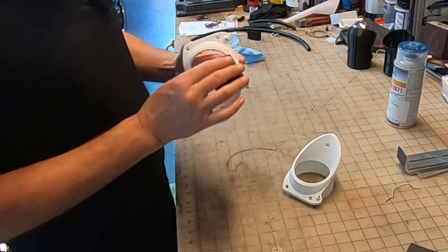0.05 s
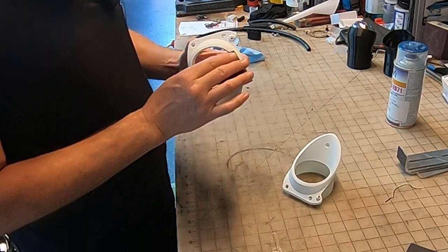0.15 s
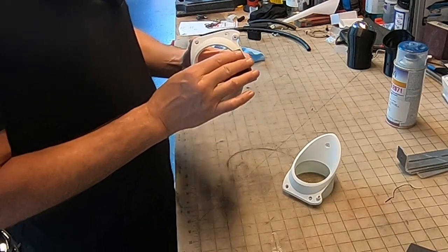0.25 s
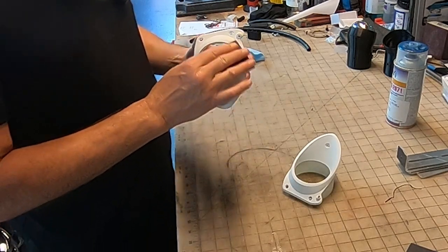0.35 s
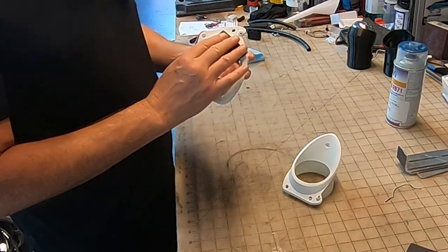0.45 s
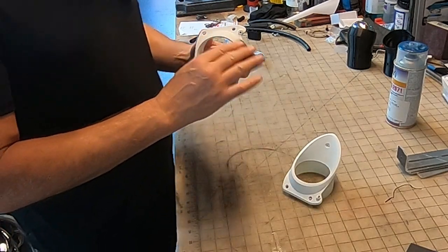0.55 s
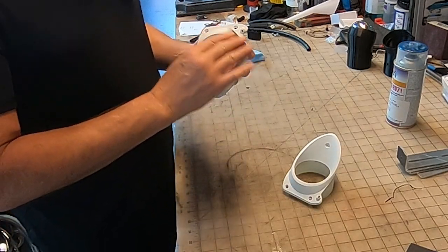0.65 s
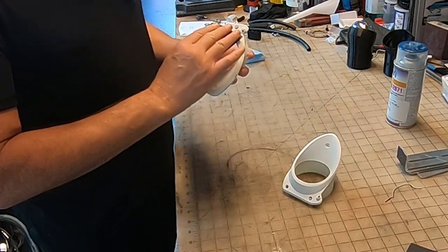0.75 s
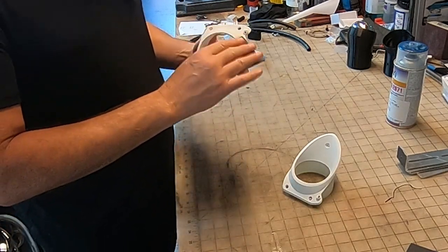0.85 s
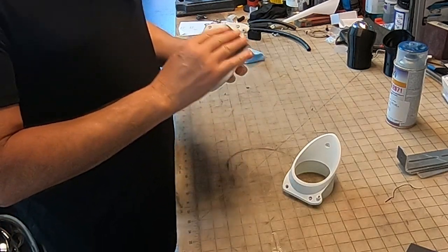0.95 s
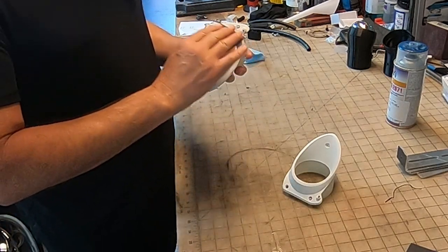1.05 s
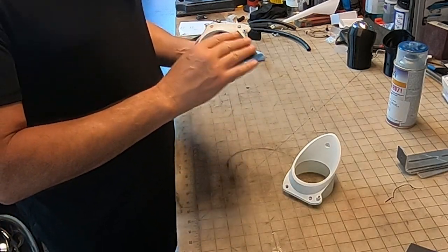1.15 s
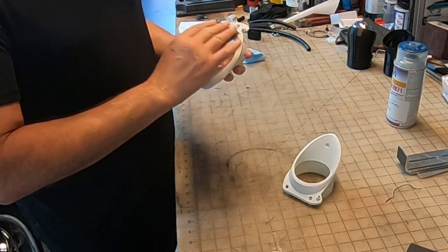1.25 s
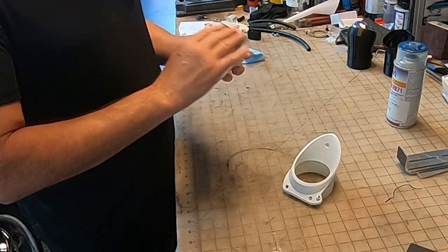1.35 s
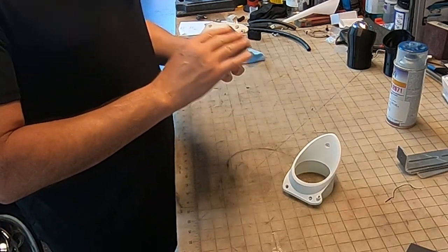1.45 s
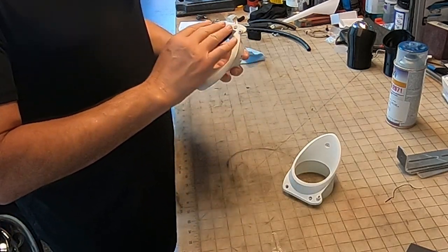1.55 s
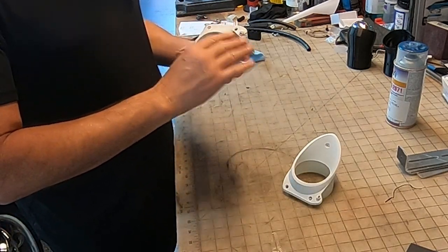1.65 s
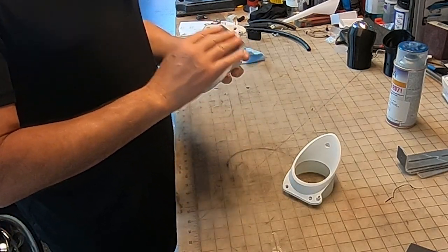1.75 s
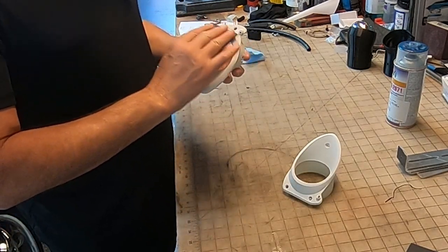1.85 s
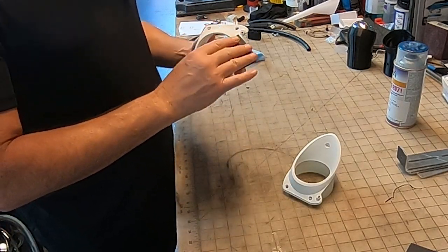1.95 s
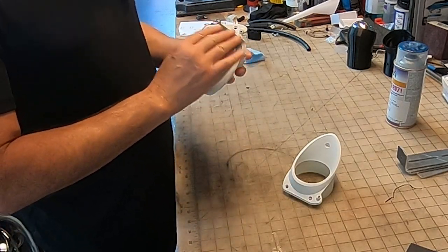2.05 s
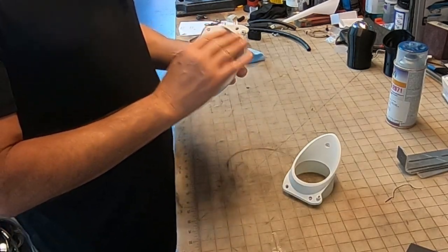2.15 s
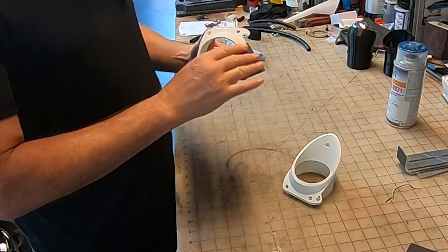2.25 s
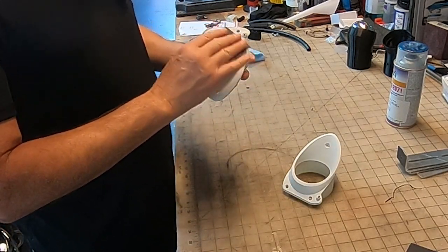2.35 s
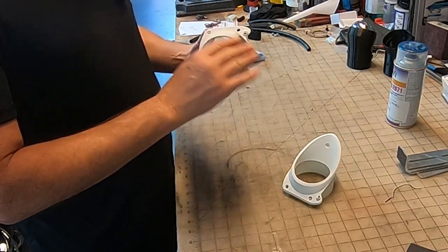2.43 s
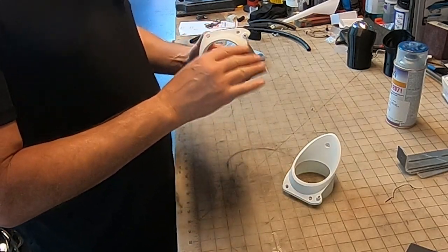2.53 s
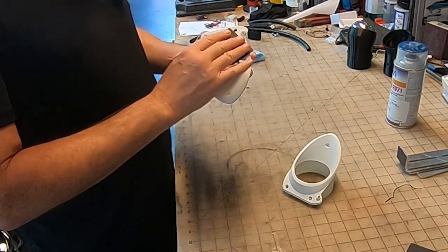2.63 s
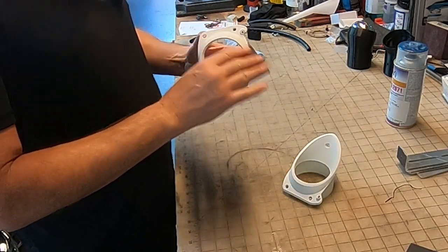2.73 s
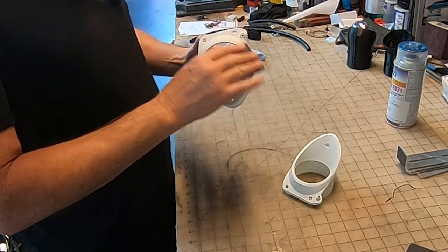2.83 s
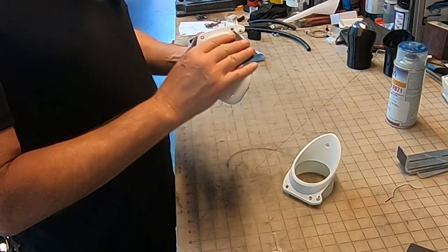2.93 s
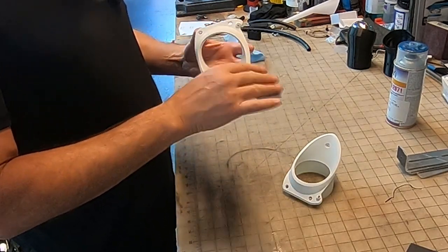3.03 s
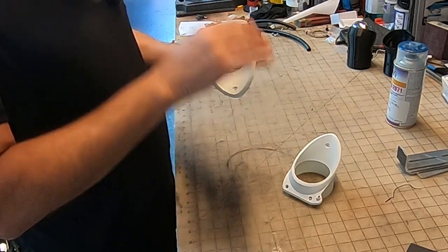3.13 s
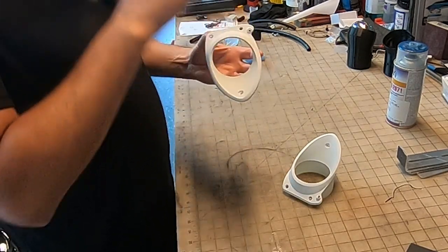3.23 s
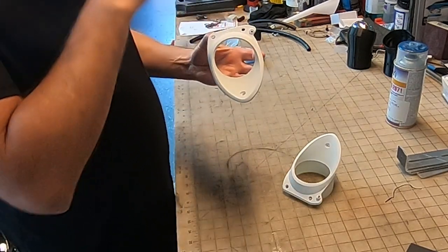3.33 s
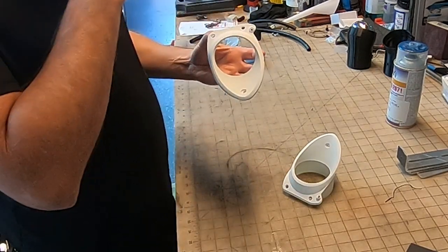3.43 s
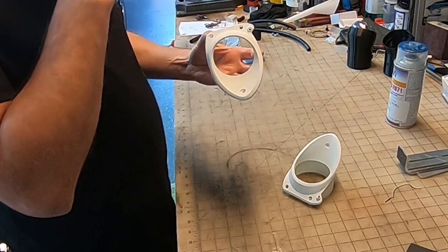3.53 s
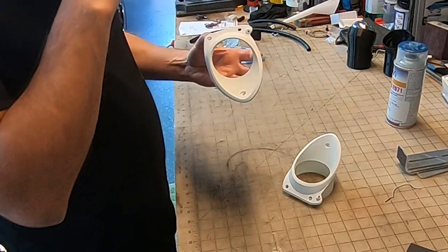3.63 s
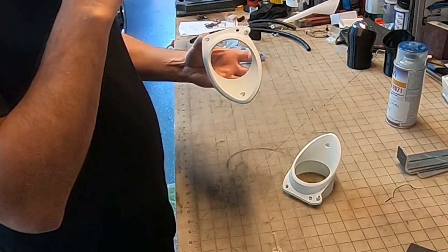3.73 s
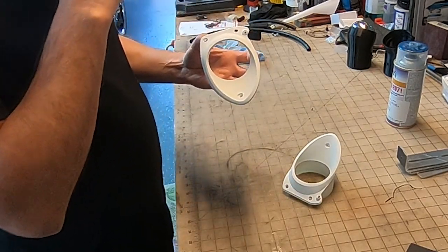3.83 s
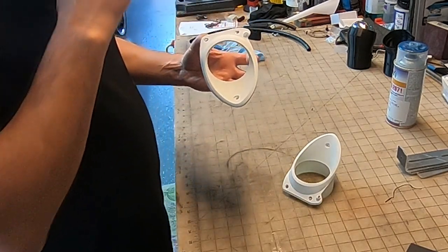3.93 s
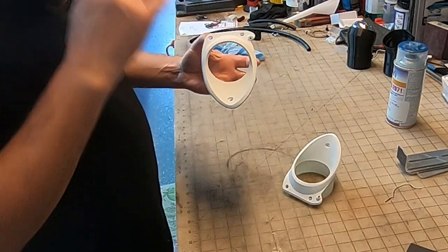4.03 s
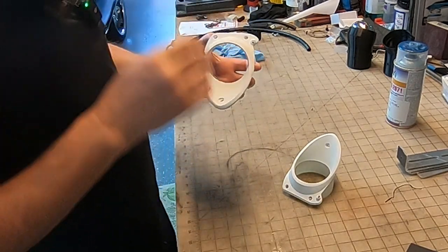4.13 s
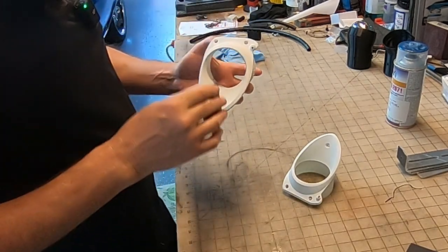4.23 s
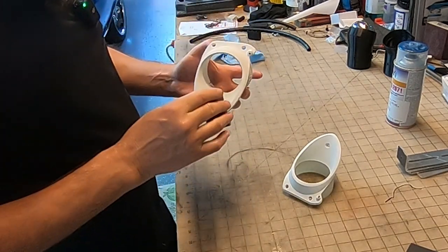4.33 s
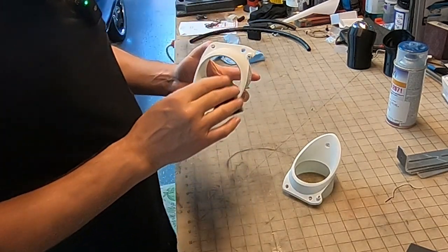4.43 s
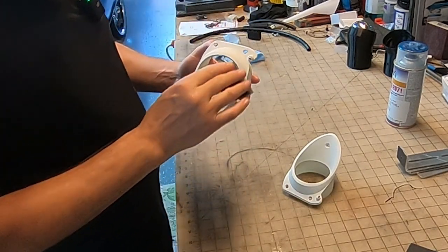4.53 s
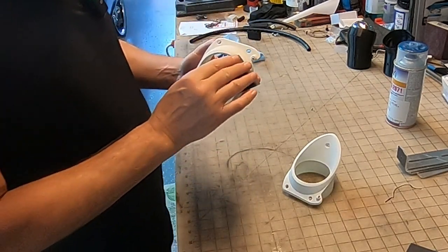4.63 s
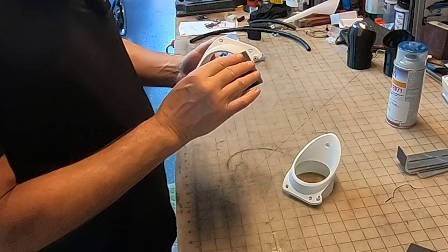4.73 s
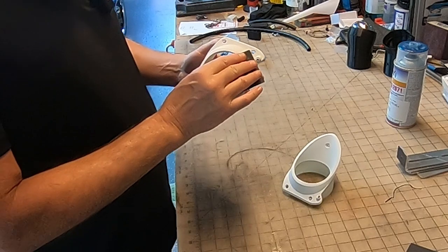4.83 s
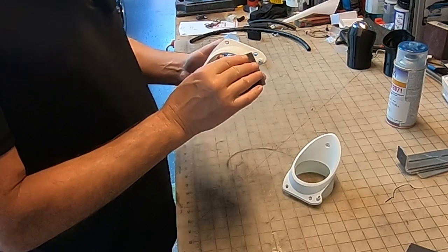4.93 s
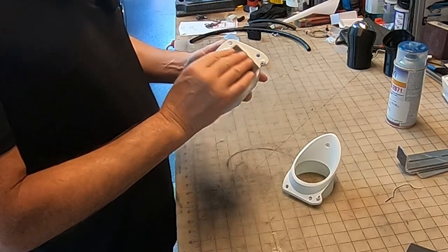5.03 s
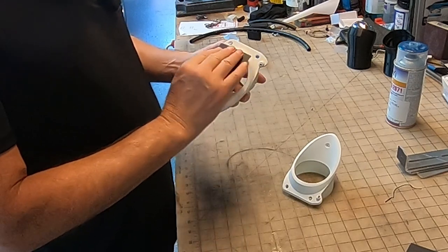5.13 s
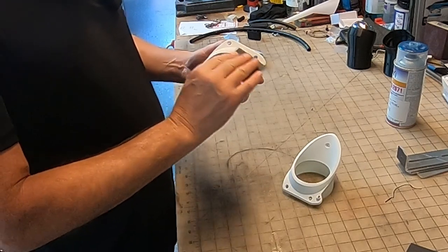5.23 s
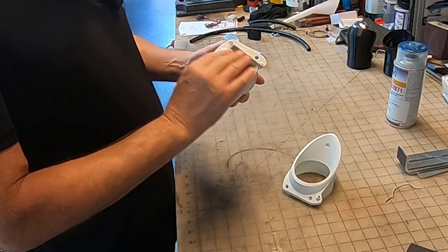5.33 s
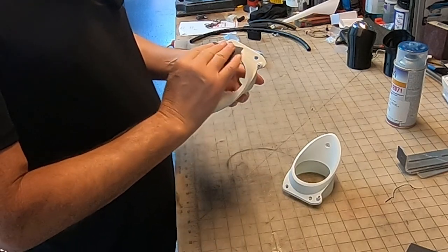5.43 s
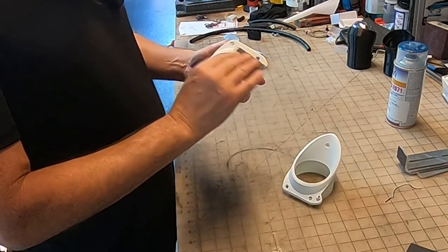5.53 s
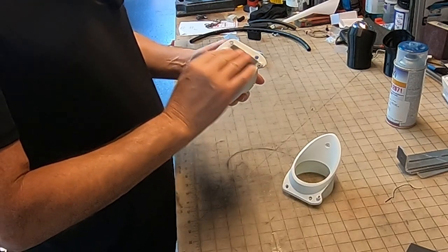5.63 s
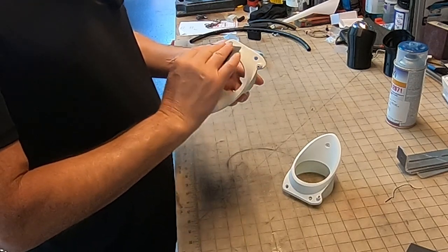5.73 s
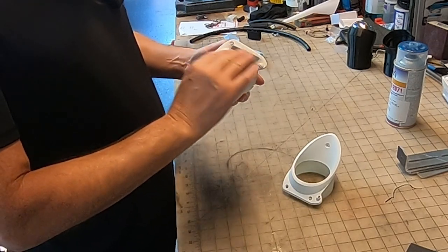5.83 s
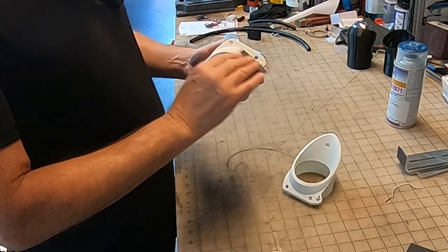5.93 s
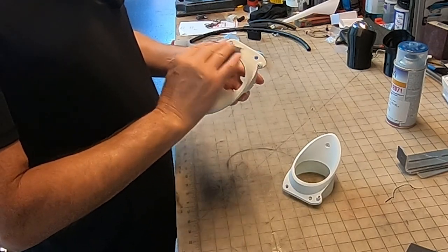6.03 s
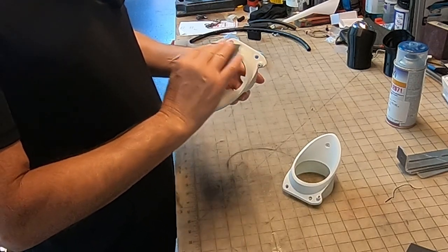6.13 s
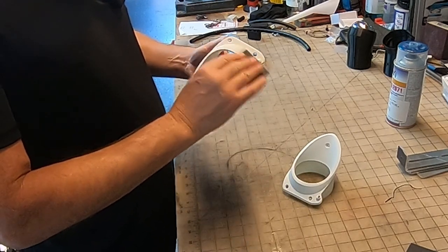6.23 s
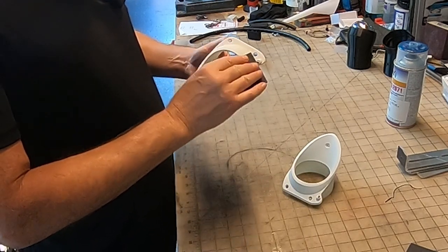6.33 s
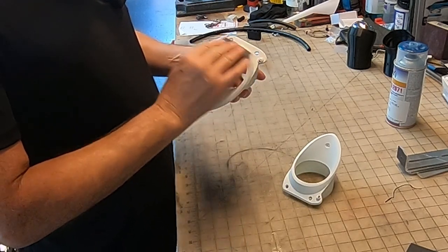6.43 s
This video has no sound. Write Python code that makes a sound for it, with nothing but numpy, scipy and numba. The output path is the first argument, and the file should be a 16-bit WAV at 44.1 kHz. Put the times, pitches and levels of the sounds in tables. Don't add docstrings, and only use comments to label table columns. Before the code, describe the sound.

A close single microphone in a workshop catches hand sanding of a small hollow plastic part. After a light touch, firm strokes begin near 0.3 s: short, dry, gritty rasps, six or seven per second, loudest around 0.6 to 1.3 s, with a nasal hollow ring and bright grain, some catching abruptly midway. A low rumble swells near 3 s as the last stroke ends with a dull knock at 3.1. The pause is far quieter: a faint rim squeak, a fingernail skipping in a tiny rattle at 3.5, paper rustling and crisp bright ticks to 4.2, soft thuds around 4.3 to 4.45. Fingertips rub lightly from 4.5, with a sharp tick at 4.85. Sanding resumes near 5 s, softer and slightly slower, about six strokes per second, easing toward 6.4 with a final tick and knock. Hiss, faint machine hum, cloth brushing and slight room echo lie behind.

```python
import sys
import numpy as np
from scipy import signal
from scipy.io import wavfile
from scipy.ndimage import uniform_filter1d
from numba import njit

SR = 44100
rng = np.random.default_rng(int(sys.argv[2]) if len(sys.argv) > 2 else 0)


def file_out(sig):
    cols = np.atleast_2d(sig).T
    lim = np.clip(cols, -1, 1)
    pcm = np.round(lim * 32767).astype(np.int16)
    wavfile.write(sys.argv[1], SR, pcm)


def convert_level_to_amplitude(level_db):
    exponent = np.asarray(level_db, float) / 20
    return 10 ** exponent


N = 285768


def unit(x):
    return x / np.sqrt(np.mean(x ** 2))


def steady(x):
    return x / np.sqrt(uniform_filter1d(x ** 2, size=3000))


@njit
def svf(x, hz, width):
    y, b, l = np.empty(len(x)), 0., 0.
    for i in range(len(x)):
        g = np.tan(np.pi * hz[i] / SR)
        k = np.pi * width / SR * (1 + g * g) / g
        v = (b + g * (x[i] - l)) / (1 + g * (g + k))
        b, l, y[i] = 2 * v - b, l + 2 * g * v, k * v
    return y


def band(x, hz, width):
    centre = np.minimum(hz * np.ones(len(x)), .45 * SR)
    return svf(x, centre, 1. * width)


def noise_band(hz, width, outer_hz, outer_width):
    return band(band(rng.standard_normal(N), hz, width), outer_hz, outer_width)


def walk(rate):
    hold = int(SR / rate)
    steps = np.repeat(rng.standard_normal(N // hold + 1), hold)
    smooth = uniform_filter1d(uniform_filter1d(steps, hold), hold)
    return unit(smooth[:N])


def swells(rows, grip_db_s, ease_db_s):
    t = np.arange(N) / SR
    gain = np.zeros(N)
    for s, held, first_db, last_db in rows:
        level = np.interp(t, [s, s + held], [first_db, last_db])
        before, after = np.maximum(s - t, 0), np.maximum(t - s - held, 0)
        gain += convert_level_to_amplitude(level - grip_db_s * before - ease_db_s * after)
    return gain


def ring(x, modes, grip_db=0., drift=0., apart=0):
    out = np.zeros(N)
    for k, (hz, width, db) in enumerate(modes):
        gain = convert_level_to_amplitude(db + grip_db * walk(14))
        drive = np.roll(x, apart * rng.integers(N))
        out += (-1) ** k * gain * band(drive, hz * (1 + drift * walk(9)), width)
    return out


def grains(rate, spread_db):
    chance = rng.random((3, N))
    happens = chance[0] < rate / SR
    size = convert_level_to_amplitude(-spread_db * np.log(chance[2] + 1e-4))
    return happens * np.sign(chance[1] - .5) * size


def strikes(times, db):
    x = np.zeros(N)
    x[(np.asarray(times) * SR).astype(int)] = convert_level_to_amplitude(np.asarray(db))
    return x


def burst(s, db, hz, width, t60):
    age, start, out = np.arange(SR // 8) / SR, int(s * SR), np.zeros(N)
    noise = rng.standard_normal(len(age)) * convert_level_to_amplitude(-60 * age / t60)
    x = band(band(noise, hz, width), hz, 2 * width)
    out[start:start + len(x)] = convert_level_to_amplitude(db) * x / np.abs(x).max()
    return out


def hiss():
    # pitch in Hz, level in dB per Hz.
    hiss_shape = [(25, -2), (60, -7), (230, -6.5), (330, -11.5), (700, -15), (1100, -11), (1750, -19),
                  (2500, -16.5), (5000, -22.5), (15000, -25.5)]
    hz, db = np.transpose(hiss_shape)
    air = np.zeros(N)
    for f in 21.5 * 2 ** np.arange(0, 9.6, .5):
        level = np.interp(np.log(f), np.log(hz), db) + walk(4.9)
        air += convert_level_to_amplitude(level) * noise_band(f, f / 2, f, f / 2)
    return convert_level_to_amplitude(-74) * unit(air)


def machine_hum():
    # pitch in Hz, level in dB.
    hum_tones = [(43, -83.5), (72, -89.5), (113, -84), (228, -84.5), (242, -85), (360, -89.5), (479, -90),
                 (600, -88), (721, -91.5)]
    t = np.arange(N) / SR
    return sum(convert_level_to_amplitude(db + 2.5 + 3.3 * walk(9)) * np.sin(2 * np.pi * hz * t + 1.46 * walk(8)) for hz, db in hum_tones)


def sleeve():
    # start in seconds, held in seconds, level at first in dB, level at last in dB.
    moves = [
        (0, 0.69, -75.5, -83.5),
        (2.29, .02, -72, -77),
        (2.9, 0.47, -83, -81.5),
        (4.5, 0.28, -85, -70),
        (4.95, 0.45, -79.5, -75.5),
        (6.1, 0.28, -86, -97),
    ]
    cloth = unit(noise_band(480, 600, 480, 900)) * convert_level_to_amplitude(1.5 * walk(30))
    rest_db, slope_db_s = -85, 83
    return (convert_level_to_amplitude(rest_db) + swells(moves, slope_db_s, slope_db_s)) * cloth


def rumble():
    # start in seconds, held in seconds, level at first in dB, level at last in dB.
    passes = [
        (0, 0.63, -75.5, -81.5),
        (2.36, 0.022, -75, -81),
        (2.62, 0.19, -70, -75.5),
        (3.0, 0.1, -66, -60.5),
        (3.3, 0.081, -83, -72.5),
        (3.9, 0.4, -79, -74),
        (4.6, 1.9, -87, -81),
    ]
    low = unit(noise_band(190 * (1 + 0.043 * walk(5.6)), 92, 208, 186)) * convert_level_to_amplitude(0.8 * walk(26))
    return swells(passes, 83, 83) * low


@njit
def walls(x, lags, gain, damp):
    line, soft, out = np.zeros((8, 4096)), np.zeros(8), np.zeros(len(x))
    for i in range(len(x)):
        total = 0.
        for k in range(8):
            soft[k] += (1 - damp) * (gain[k] * line[k, (i - lags[k]) & 4095] - soft[k])
            total += soft[k]
        out[i] = total - 2 * (soft[0] + soft[3] + soft[5])
        for k in range(8):
            line[k, i & 4095] = x[i] + soft[k] - total / 4
    return out


def room(near):
    t60_s, damp, level_db = 0.55, 0.15, -33
    lags = rng.integers(700, 2800, size=8)
    return convert_level_to_amplitude(level_db) * walls(near, lags, convert_level_to_amplitude(-60 * lags / SR / t60_s), damp)


def knocks():
    # start in seconds, peak in dB, pitch in Hz, time to die by 60 dB in seconds.
    dull_knocks = [
        (2.314, -57, 500, 0.038),
        (3.078, -43.5, 443, 0.073),
        (4.3, -66, 125, 0.25),
        (4.327, -60, 423, 0.091),
        (4.449, -55, 760, 0.025),
        (5.777, -58, 503, 0.042),
        (6.299, -56.5, 616, 0.3),
    ]
    return sum(burst(s, db, hz, 0.74 * hz, t60) for s, db, hz, t60 in dull_knocks)


def paper_ticks(soft_wall):
    # start in seconds, peak in dB, pitch in Hz.
    snaps = [(3.1985, -51, 5600), (3.5114, -66, 13200), (3.5498, -65, 8410), (3.6062, -57, 11700),
             (3.629, -51, 12500), (3.6454, -55, 15000), (3.671, -53.5, 8000), (3.7279, -59, 14300),
             (3.7489, -53, 13400), (3.791, -53, 14500), (3.874, -46, 11900), (3.918, -44, 14700),
             (3.9594, -63, 12100), (4.0078, -59, 8410), (4.0964, -57, 6560), (4.1689, -64, 15300),
             (4.8519, -48, 7400), (4.911, -61, 8340), (6.324, -43.5, 7000)]
    bright = sum(burst(s, db, hz, 6700, 0.0085) for s, db, hz in snaps)
    s, db, _ = np.transpose(snaps)
    return bright + ring(strikes(s, db + 6), soft_wall)


def nail():
    # pitch in Hz, width in Hz, level in dB.
    nail_modes = [(1630, 180, 2.5), (4100, 190, -2), (8340, 840, -11.5), (12000, 1500, -16),
                  (15000, 900, -7)]
    k = np.arange(7)
    skip_s = 3.468 + .0022 * (k + 0.39 * rng.random(len(k)))
    skip_db = -44 - 2.2 * k - 3 * (k % 2)
    tap_s, tap_db = 3.4996, -51
    return ring(strikes(np.append(skip_s, tap_s), np.append(skip_db, tap_db) + 19.0), nail_modes)


def hollow():
    # start in seconds, held in seconds, level at first in dB, at last in dB.
    brushes = [
        (0, .19, -75, -78),
        (3.56, 0.073, -88, -78),
        (3.75, .05, -82, -88),
        (3.86, 0.08, -91, -67),
    ]
    hz, width = 1730, 90
    air = grains(rate=900, spread_db=0.5)
    air = unit(band(band(air, hz, width), hz, 3 * width))
    return swells(brushes, 400, 250) * convert_level_to_amplitude(3.7 * walk(45)) * air


def slide():
    # start in seconds, held in seconds, level at first in dB, level at last in dB.
    slides = [
        (.13, .12, -92, -87),
        (3.2, 0.13, -78, -87),
        (4.08, 0.23, -90, -91),
        (4.55, .14, -88, -83),
    ]
    hz, width = 3900, 240
    tone = band(band(grains(rate=3000, spread_db=3.5), hz, width), hz, 2 * width)
    return swells(slides, 300, 200) * unit(tone)


def slowness(late_s, span_s):
    return -np.log10(np.clip(1 - late_s / span_s, 1e-4, 1))


def snap(s):
    t = np.arange(N) / SR - s
    slip_s, bite_s = 0.017, 0.025
    return np.where(t < 0, -np.exp(-abs(t) / slip_s), np.exp(-abs(t) / bite_s))


def hand(motions, grip_s, ease_s):
    # time in seconds, jump in dB.
    bites = [
        (0.573, 11),
        (0.862, 6.4),
        (1.127, 5),
        (1.946, 12),
        (2.201, 8.5),
        (2.471, 8.5),
        (2.733, 10.5),
        (3.008, 6),
    ]
    # time in seconds, ring change in dB, fine grit change in dB.
    spots = [(.33, -2.5, 2.5), (.58, -2, 0.5), (0.736, 6.5, 2), (0.799, 7, 1.5), (.87, -1.5, -1.5),
             (.93, -1.5, -4), (1.02, 7.5, 2), (1.14, -3, -3.5), (1.21, -2, 1), (1.38, -5.5, 2),
             (1.54, 2, -1), (1.63, 3, 1), (1.69, 1.5, 0), (1.75, 2, 1), (1.9, 4.5, 1), (1.95, -2.5, -2.5),
             (2.15, 6.5, -0.5), (2.23, 4.5, -4.5), (2.38, 2, -1), (2.43, 7, .6), (2.6, -5.5, 3),
             (2.74, 1, -0.5), (2.92, 4.5, 1), (3.05, -9.5, -2), (5.0, -5.5, -4), (5.08, 3.5, -3),
             (5.26, -1, 2), (5.53, -6, 0.5), (5.73, 7.5, -3), (6.38, -0.5, -3.5)]
    grip_curve_db, ease_curve_db = 19, 26.5
    stick_share, stick_db = 0.49, 8
    ring_follows, ring_late_s = .55, .005
    t = np.arange(N) / SR
    out = np.zeros((3, N)) - 120
    for s, held, first_db, last_db, ring_db, grit_db in motions:
        end = s + held
        press = np.interp(t, [s, end], [first_db, last_db])
        for bite_s, jump_db in bites:
            if s < bite_s < end + ease_s:
                press = press + jump_db * (t > bite_s) + snap(bite_s)
                last_db = last_db + jump_db
        loose = np.clip((t - s + stick_share * grip_s) / .001, -30, 30)
        rise = grip_curve_db * slowness(s - t, grip_s) + stick_db / (1 + np.exp(loose))
        fade = ease_curve_db * slowness(t - end, ease_s)
        late_fade = ease_curve_db * slowness(t - end - ring_late_s, ease_s)
        drag = np.where(t > end, -13.5 + 126 * (end - t), -120)
        level = press - rise + np.maximum(-fade, drag)
        pressure_change = press - (first_db + last_db) / 2
        rings = ring_db + ring_follows * pressure_change - rise + np.maximum(-late_fade, drag - 3)
        grit = grit_db - 0.11 * np.minimum(fade + rise, 20)
        out = np.where(level > out[0], np.array([level, rings - level, grit]), out)
    for s, *change_db in spots:
        out[1:] += np.outer(change_db, np.exp(-((t - s) / 0.015) ** 2))
    out[2] += 1.2 * walk(10)
    return out


def held_as(modes, changes):
    t = np.arange(N) / SR
    early, late = t < .95, t > 4
    return [(hz, width, db + first_db * early + last_db * late)
            for (hz, width, db), (first_db, last_db) in zip(modes, changes)]


def rub(motion, wall_modes, rim_modes, grit_modes, grip_db):
    rub_db, wall_db, fine_db = motion
    catch = grains(rate=12000, spread_db=2.5)
    wall = steady(ring(catch, wall_modes, grip_db, drift=0.018, apart=True))
    rim = steady(ring(catch, rim_modes, 0.88 * grip_db, drift=0.0095, apart=True))
    fine = steady(ring(catch, grit_modes, 1.0 * grip_db, apart=True))
    rim_share = np.sqrt(np.clip(1 - convert_level_to_amplitude(2 * fine_db), .15, 1))
    patchy = convert_level_to_amplitude(0.85 * walk(60) + 0.7 * walk(400))
    mix = convert_level_to_amplitude(wall_db + 1.36) * wall + convert_level_to_amplitude(-0.97) * rim_share * rim + convert_level_to_amplitude(fine_db + 0.3) * fine
    return patchy * convert_level_to_amplitude(rub_db) * mix


def light_touches(soft_wall):
    # full contact in seconds, held in seconds, rub at first in dB,
    # rub at last in dB, ring of the part in dB.
    fingertips = [
        (0.039, 0.0071, -69, -68.5, -76),
        (0.251, 0.058, -64, -59, -63.5),
        (3.198, 0.14, -78, -86, -78),
        (4.03, 0.078, -84, -69.5, -80.5),
        (4.13, .1, -87, -82, -91),
        (4.245, .02, -69.5, -75, -74),
        (4.5, 0.178, -88, -68.5, -78),
        (4.698, 0.089, -62.5, -62.5, -63),
        (4.78, 0.15, -61.5, -71.5, -68.5),
        (6.301, 0.06, -66, -65, -64.5),
    ]
    rustles = [
        (3.472, .01, -78, -82, -77),
        (3.54, 0.1, -85, -68.5, -84),
        (3.74, 0.057, -69.5, -70, -77),
        (3.88, 0.077, -69, -64, -73),
    ]
    # pitch in Hz, width in Hz, level in dB.
    soft_rim = [(3600, 490, -0.5), (5130, 600, -1.5), (6600, 740, -1.5), (8400, 1200, -1.5)]
    soft_grit = [(10900, 2800, -0.46), (13500, 2600, -0.16), (15000, 2600, -1.5)]
    motions = [(*row, -5.5) for row in fingertips] + [(*row, -0.7) for row in rustles]
    light = hand(motions, grip_s=0.016, ease_s=0.031)
    return rub(light, soft_wall, soft_rim, soft_grit, grip_db=-1.0)


def firm_strokes():
    # full contact in seconds, held in seconds,
    # rub at first in dB, rub at last in dB, ring of the part in dB.
    early_strokes = [(0.297, 0.12, -49.5, -44, -52), (0.528, 0.022, -43.9, -49.5, -50),
                     (0.645, 0.074, -39.5, -43, -52.5), (0.806, 0.034, -43, -43.5, -52),
                     (0.93, 0.064, -40, -45.5, -53.5), (1.09, 0.015, -41, -45.5, -50),
                     (1.198, 0.076, -43, -47, -51.5), (1.353, 0.027, -45.0, -43, -49.5),
                     (1.476, 0.061, -46.0, -50, -52.5), (1.624, 0.035, -46.5, -45, -53),
                     (1.745, 0.064, -43, -50.5, -53), (1.891, 0.034, -46, -47, -50.5),
                     (2.019, 0.05, -43.5, -47, -52.5), (2.157, 0.055, -50.7, -49.5, -55.5),
                     (2.303, 0.046, -44.5, -46.5, -54), (2.44, 0.055, -53, -49.5, -55),
                     (2.584, 0.044, -44.5, -45.5, -55), (2.718, 0.05, -53.5, -51, -53),
                     (2.854, 0.047, -45.5, -47, -56.5), (2.989, 0.047, -53, -47.5, -54.5)]
    late_strokes = [
        (4.984, 0.11, -51.5, -48.5, -51),
        (5.183, 0.05, -47, -49.5, -53.5),
        (5.326, 0.072, -49.4, -47.5, -54.5),
        (5.487, 0.044, -48, -45, -52.5),
        (5.628, 0.072, -47.4, -51, -56.5),
        (5.8, 0.065, -48, -48.5, -55.8),
        (5.957, 0.091, -47.5, -51, -57.0),
        (6.141, 0.11, -51.3, -51, -57),
        (6.368, 0.1, -49.5, -52, -58),
    ]
    # pitch in Hz, width in Hz, level in dB.
    wall_modes = [(878, 41, -6.5), (1206, 154, -15), (1470, 100, -5), (1702, 195, 0), (2056, 510, -2),
                  (2392, 79, 2.5), (2630, 108, -1), (3380, 420, -11.5), (3643, 520, -4.5)]
    rim_modes = [(4600, 380, -2.5), (5016, 380, 7.5), (5400, 420, 0.5), (6206, 310, 6.5), (6780, 730, -2),
                 (7750, 500, 3), (8010, 2100, -8)]
    grit_modes = [(9030, 1600, -1.5), (9300, 5600, -9.5), (11130, 1200, -3), (13200, 5200, -5),
                  (15000, 1600, -2.5)]
    # change at first in dB, change at last in dB.
    wall_hold = [(0, -0.22), (2.5, -.3), (1.5, 1), (2, -0.45), (-2, 0.87), (-2.5, -1.5), (-0.5, 1.27),
                 (1, -1), (-1.5, -2)]
    rim_hold = [(-1.1, .3), (0.063, -1), (-.3, -2.3), (-0.65, 1.4), (.3, 3.1), (1, 0.5), (.3, .3)]
    motions = [(*row, -2.5) for row in early_strokes + late_strokes]
    firm = hand(motions, grip_s=0.044, ease_s=0.069)
    return rub(firm, held_as(wall_modes, wall_hold), held_as(rim_modes, rim_hold), grit_modes, grip_db=3.2)


def scene():
    # pitch in Hz, width in Hz, level in dB.
    soft_wall = [(1090, 640, -5.5), (1610, 310, -2.5), (2210, 270, 0.5), (3100, 720, -9)]
    background = hiss() + machine_hum() + sleeve() + rumble()
    handling = knocks() + paper_ticks(soft_wall) + nail()
    near = handling + hollow() + slide() + light_touches(soft_wall) + firm_strokes()
    return np.tile(near + room(near) + background, (2, 1))


def roll_off(x):
    return signal.sosfilt(signal.butter(12, 16570, fs=SR, output="sos"), x)


def record(dry):
    port = dry + convert_level_to_amplitude(-6) * band(dry[0], 15300, 1000)
    low_pass = signal.ellip(10, .3, 60, 15830, fs=SR, output="sos")
    cut = signal.sosfilt(low_pass, port)
    return roll_off(cut)


dry = scene()
out = record(dry)
file_out(out)
```